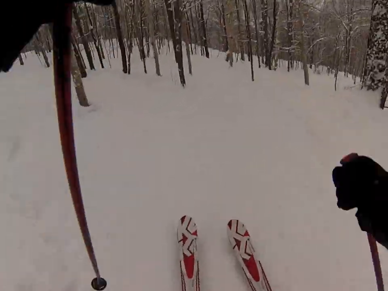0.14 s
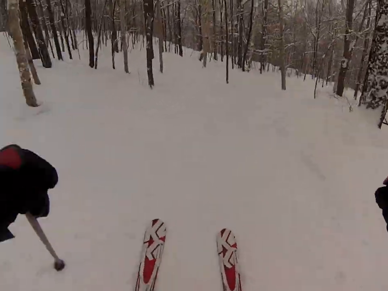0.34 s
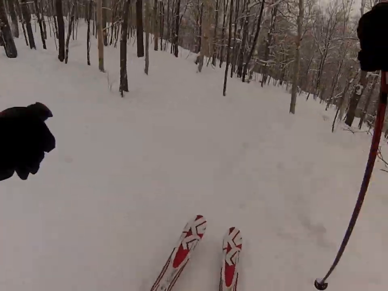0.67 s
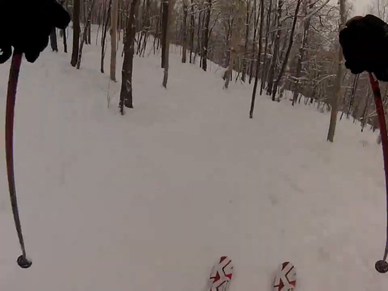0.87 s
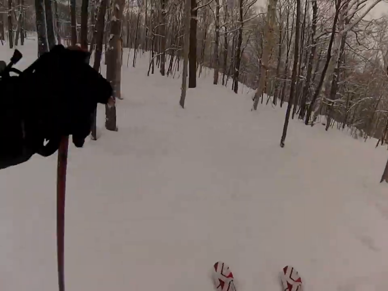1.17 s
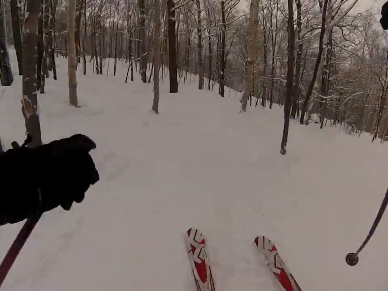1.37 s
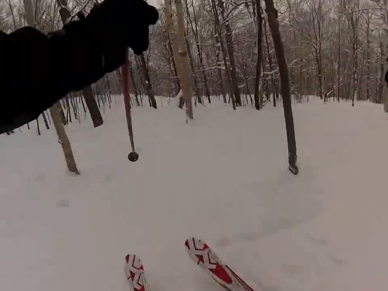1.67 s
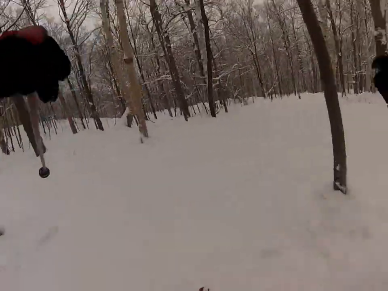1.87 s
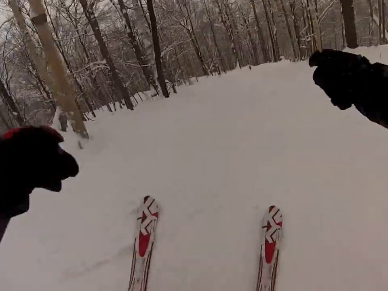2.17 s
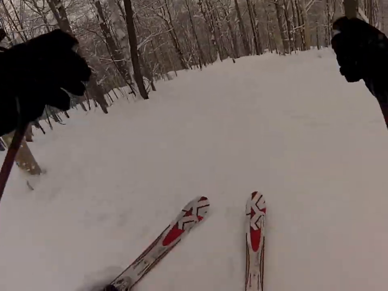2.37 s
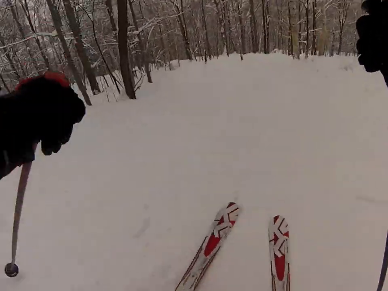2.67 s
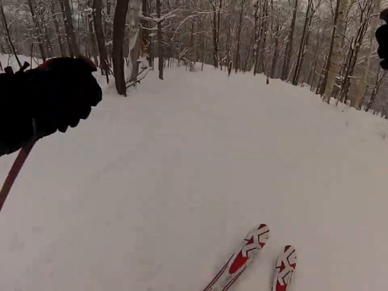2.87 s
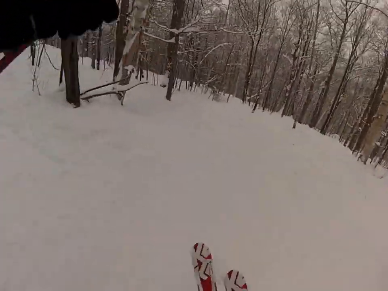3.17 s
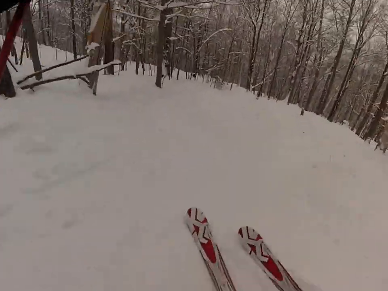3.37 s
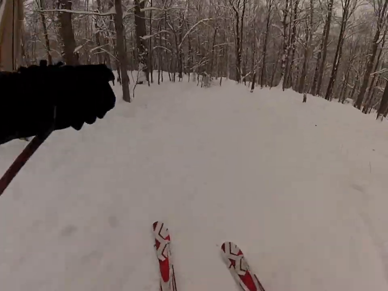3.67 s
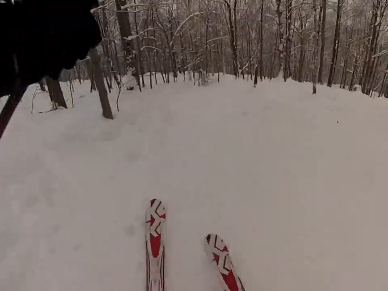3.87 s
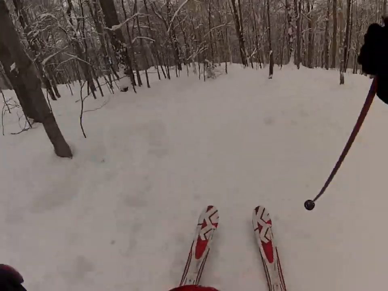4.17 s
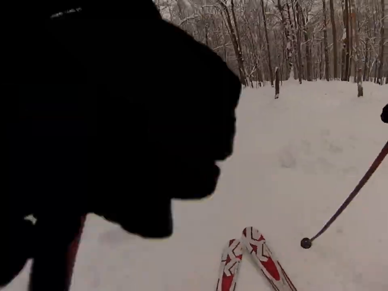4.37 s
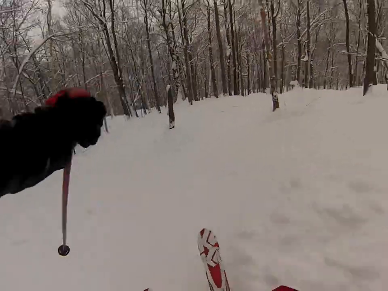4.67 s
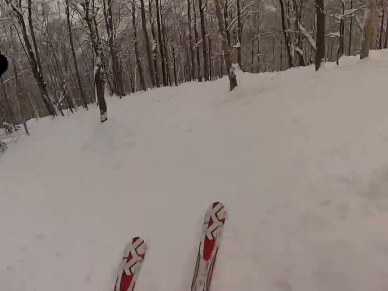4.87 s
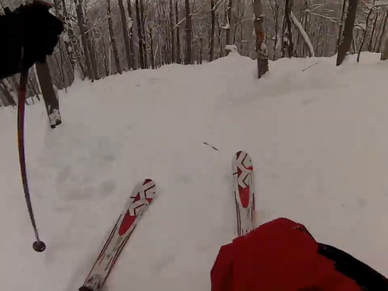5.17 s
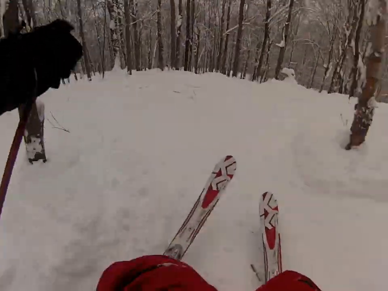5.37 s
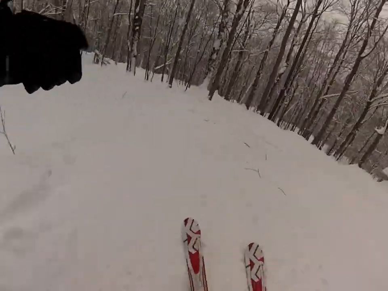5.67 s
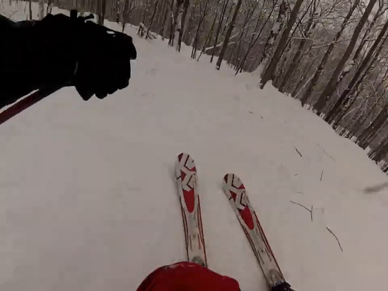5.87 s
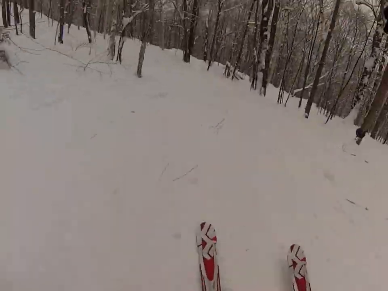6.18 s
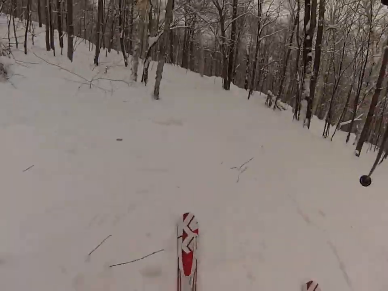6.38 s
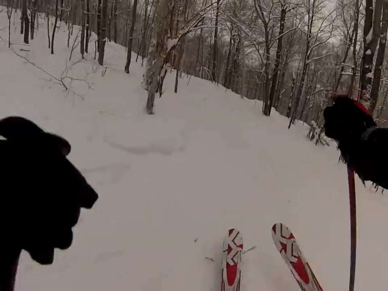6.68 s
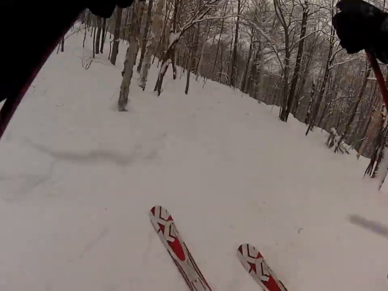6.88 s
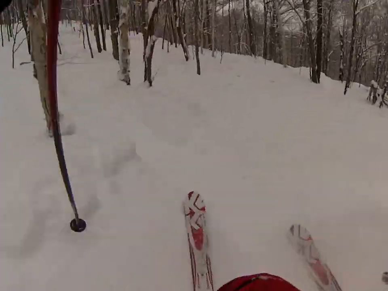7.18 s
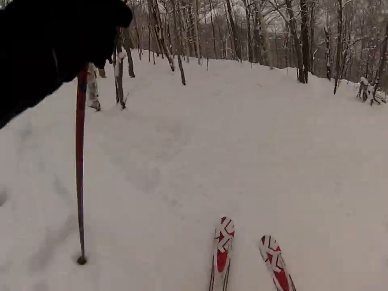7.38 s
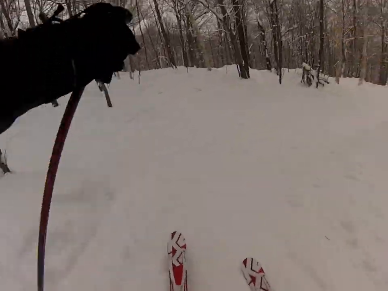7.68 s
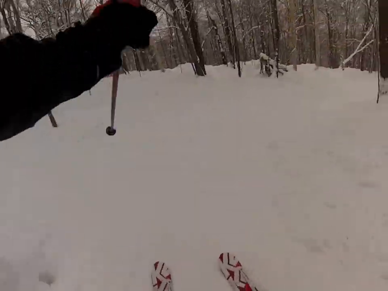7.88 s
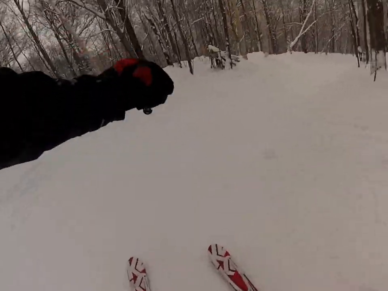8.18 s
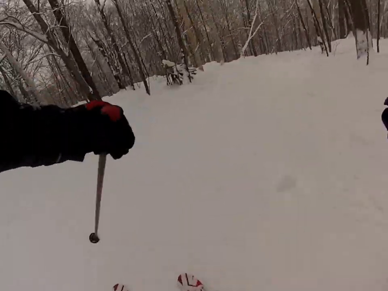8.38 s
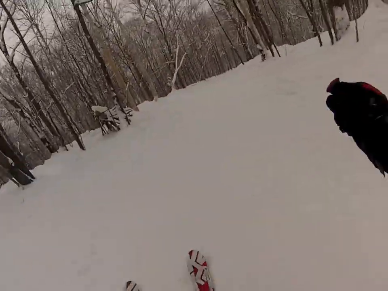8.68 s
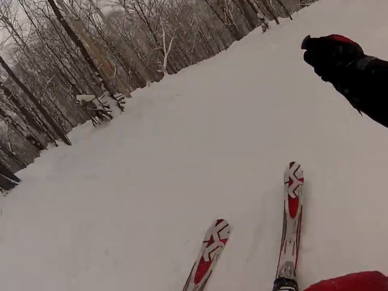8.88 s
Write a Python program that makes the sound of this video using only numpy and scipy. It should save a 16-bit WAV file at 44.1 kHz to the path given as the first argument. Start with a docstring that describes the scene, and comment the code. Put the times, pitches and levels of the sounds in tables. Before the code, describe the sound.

Heard through a closed plastic case on a skier's body, soft snow crunches and hisses in uneven swells as the skis carve down a slope. Wind rumbles low, gusting early and again midway. Heavy thumps jolt the microphone in bunches, mixed with sharp hollow clacks of gear and tiny ticks of thrown snow. Later the edges bite harder with a faint squeak, and a last swish ends in a few knocks.

```python
"""Skiing deep powder.

Heard from a camera in a closed plastic case worn by the skier. Each carve and scuff swells the
crunch of snow in the case's resonances; air and body motion rumble, and bumps jolt the mount.
Gear knocks and rattles against the case, and thrown snow crystals tick on it."""
import sys
import numpy as np
from scipy.fft import rfft, irfft, next_fast_len
from scipy.io import wavfile
from scipy.ndimage import uniform_filter1d, map_coordinates

SR = 44100
rng = np.random.default_rng(int(sys.argv[2]) if len(sys.argv) > 2 else 0)


def file_out(sig):
    """Save sig as 16-bit WAV at sys.argv[1]."""
    # one column per channel
    cols = np.atleast_2d(sig).T
    # limit, then scale
    lim = np.clip(cols, -1, 1)
    pcm = np.round(lim * 32767).astype(np.int16)
    wavfile.write(sys.argv[1], SR, pcm)


N = 398663


def amp(db):
    return 10 ** (np.asarray(db) / 20)


def unit_rms(x):
    return x / np.sqrt(np.mean(x ** 2) + 1e-20)


def db_at(spectrum, hz):
    """Interpolate (f/Hz, level/dB) rows on a log frequency axis."""
    row_hz, row_db = np.transpose(spectrum)
    return np.interp(np.log(hz + 1), np.log(row_hz), row_db)


def level_curve(rows):
    """Interpolate (t/s, level/dB) rows to one level per sample."""
    row_s, row_db = np.transpose(rows)
    return np.interp(np.arange(N) / SR, row_s, row_db)


def wobble(rate_hz):
    """Smooth random curve through rate_hz knots a second."""
    knots = rng.standard_normal(int(N * rate_hz / SR) + 4)
    return map_coordinates(knots, [np.arange(N) * rate_hz / SR])


def below(hz, edge_hz, order=8):
    """Low-pass gain."""
    return 1 / np.sqrt(1 + (hz / edge_hz) ** (2 * order))


def above(hz, edge_hz, order=8):
    """High-pass gain."""
    return np.sqrt(1 - below(hz, edge_hz, order) ** 2)


def resonance(hz, centre_hz, q):
    """Gain of two equal resonators in series."""
    ratio = (hz + 1) / centre_hz
    return 1 / (1 + (q * (ratio - 1 / ratio)) ** 2)


def filtered(x, gain):
    """Minimum-phase filter of magnitude gain(hz)."""
    half = next_fast_len(len(x) // 2 + SR // 20)
    hz = np.fft.rfftfreq(2 * half, 1 / SR)
    cepstrum = irfft(np.log(np.maximum(gain(hz), 1e-6)))
    cepstrum[1:half] *= 2
    cepstrum[half + 1:] = 0
    return irfft(rfft(x, 2 * half) * np.exp(rfft(cepstrum)))[:len(x)]


def shaped(x, spectrum):
    """Filter by a spectrum table, then scale to rms 1."""
    return unit_rms(filtered(x, lambda hz: amp(db_at(spectrum, hz))))


def add(track, start_s, sound):
    part = track[max(round(start_s * SR), 0):][:len(sound)]
    part += sound[:len(part)]


def crunch(rate_hz, spread_db, grain_db):
    """Smooth powder hiss plus tiny fractures of uneven size, rms 1."""
    size = amp(spread_db * np.minimum(rng.exponential(size=N), np.pi + 2))
    grains = (rng.random(N) < rate_hz / SR) * size * rng.choice([-1, 1], N)
    return unit_rms(rng.standard_normal(N) + amp(grain_db) * unit_rms(grains))


def swell(start_s, hold_s, attack_s, release_s):
    """Power of a stroke: builds, holds at 1, lets go."""
    t = np.arange(N) / SR - start_s
    away = np.maximum(-t / attack_s, (t - hold_s) / release_s)
    return np.exp(-np.clip(away, 0, 2 * np.pi) ** 2)


# Case resonances: f/Hz, width/Hz, lift/dB
CASE_MODES = [(990, 140, 3), (1450, 170, 7.5), (2120, 400, 8.5), (3560, 380, 6), (4420, 500, 4.5),
              (7230, 650, 5), (11050, 900, 3.5)]
def case_lift_db(hz):
    """Boost from the case's resonances."""
    return sum(db / (1 + (2 * (hz - mode_hz) / width_hz) ** 2) for mode_hz, width_hz, db in CASE_MODES)


# Wall transmission: f/Hz, gain/dB
WALL_GAIN = [(200, -11), (800, -15.5), (1150, -11.5), (1450, -6.5), (2400, -5.5), (2950, -17),
             (3400, -16.5), (5200, -16.5), (5800, -21.5), (7000, -22), (8300, -26), (12000, -33.5),
             (15500, -39)]
def case(hz):
    """Gain of the case: a dull wall lifted at its resonances."""
    return amp(db_at(WALL_GAIN, hz) + case_lift_db(hz))


# Skis running flat: t/s, rush/dB
GLIDE_LEVELS = [(0, -53.5), (1.2, -61), (1.8, -57), (3.05, -56.5), (3.8, -53.5), (4.35, -55), (5.2, -53),
                (5.7, -55), (6.8, -51.5), (7.7, -56.5), (8.38, -61), (8.6, -57), (9.04, -51.5)]
# Weight on the edges: t/s, length/s, rush/dB, spray/dB, rumble/dB
EDGE_CARVES = [(0.0, 0.18, -50.5, -60, -47.5), (.47, 0.21, -56.5, -65, -51), (0.818, 0.36, -57, -64.5, -48),
               (1.263, 0.23, -48.5, -57, -45.5), (1.59, 0.13, -54, -64, -48), (2.021, .27, -50, -58, -46.5),
               (2.37, 0.17, -49.5, -58, -48), (2.798, 0.15, -55, -61, -51), (3.195, 0.45, -49, -59, -42.5),
               (4.038, 0.19, -61, -70, -51), (4.48, 0.13, -48.5, -52.5, -39.5),
               (4.623, .16, -52, -62, -50.5), (4.888, 0.48, -51, -58.5, -44.5),
               (5.862, 0.21, -50.5, -62, -42), (6.175, 0.25, -54.5, -73, -45.5),
               (6.521, 0.19, -50.5, -57, -44), (6.846, .66, -48.5, -58.5, -49),
               (6.988, .13, -37.5, -48, -48), (7.933, 0.11, -54, -64, -51.5),
               (8.449, 0.19, -53, -60, -54.5), (8.72, .31, -51, -60, -48), (8.895, 0.12, -43.5, -54.5, -43)]
# An edge brushing a drift: t/s, rush/dB
EDGE_SCUFFS = [(.19, -50.5), (.68, -48), (.81, -54), (.98, -50.5), (1.08, -52), (1.70, -48), (1.905, -45.5),
               (2.13, -63), (2.671, -54.5), (2.90, -57), (4.20, -48), (4.31, -55), (4.77, -50.5),
               (4.94, -40.5), (5.10, -44.5), (5.232, -40), (5.33, -46), (5.39, -45.5), (5.51, -63),
               (5.69, -48.5), (5.77, -51), (5.87, -46), (6.02, -47), (6.25, -47), (6.61, -44.5),
               (7.11, -43), (7.23, -41.5), (7.47, -49.5), (8.01, -53.5), (8.29, -57.5), (8.78, -56)]
def footwork(attack_s=0.025, release_s=0.023, spray_hang_s=0.034, shudder_s=0.014):
    """Rush, spray and rumble in dB: glide, carves, scuffs and shudder after bumps add in power."""
    glide = amp(level_curve(GLIDE_LEVELS)) ** 2
    scuffs = sum(amp(db) ** 2 * swell(s, 0, attack_s=0.023, release_s=0.02) for s, db in EDGE_SCUFFS)
    rush = glide + scuffs
    spray = amp(-7) ** 2 * glide + amp(-12.5) ** 2 * scuffs
    rumble = amp(1.5) ** 2 * glide + amp(-0.5) ** 2 * scuffs
    for s, length_s, rush_db, spray_db, rumble_db in EDGE_CARVES:
        weight = swell(s, length_s, attack_s, release_s)
        rush += amp(rush_db) ** 2 * weight
        spray += amp(spray_db) ** 2 * swell(s, length_s, attack_s, spray_hang_s)
        rumble += amp(rumble_db) ** 2 * weight
    shudder = np.exp(-np.arange(SR // 2) / SR / shudder_s)
    for s, db, _ in BUMPS:
        add(rumble, s, amp(db - 25.5) ** 2 * shudder)
    return 10 * np.log10([rush, spray, rumble])


def powder_rush(crush):
    """The rush drifts between hollow and bright as the skis change angle."""
    hollow = filtered(crush, lambda hz: case(hz) * above(hz, 315, order=2) * below(hz, 1980, order=5))
    grit = crunch(rate_hz=450, spread_db=5, grain_db=-4)
    bright = filtered(grit, lambda hz: case(hz) * above(hz, 1447, order=5) * below(hz, 3340))
    tilt_db = 1.1 * wobble(16)
    return unit_rms(hollow * amp(tilt_db) + bright * amp(-tilt_db))


# Case modes rung by a biting edge: f/Hz, width/Hz, level/dB
SQUEAK_MODES = [(1450, 150, 0), (2130, 260, -6), (3560, 350, -20)]
def edge_squeak():
    """A loaded edge bites firmer snow and keeps the case's three strongest modes ringing."""
    def gain(hz):
        modes = sum(amp(db) * resonance(hz, mode_hz, q=mode_hz / width_hz)
                    for mode_hz, width_hz, db in SQUEAK_MODES)
        return above(hz, 940, order=4) * below(hz, 6000) * modes
    return unit_rms(filtered(crunch(rate_hz=510, spread_db=5, grain_db=-4), gain))


# Snow crystals on the case: f/Hz, density/dB
CRYSTAL_SPECTRUM = [(1500, -30), (4000, -2), (7200, 5), (9000, -3.5), (11500, -2), (15500, -8.5)]
def powder_spray(crush, pressure):
    """Fine spray hisses; a few thrown crystals sparkle above it."""
    powder = crush + crunch(rate_hz=1600, spread_db=6, grain_db=-12.5)
    mist = unit_rms(filtered(powder, lambda hz: case(hz) * above(hz, 3080)))
    sparkle = shaped(crunch(rate_hz=180, spread_db=2.4, grain_db=2), CRYSTAL_SPECTRUM)
    flurry_db = 0.5 * pressure + 1.1 * wobble(60)
    return mist * amp(flurry_db) + sparkle * amp(-14.5 + 2.2 * wobble(29))


def snow(rush_db, spray_db, bite_db=-41):
    """Skis crush powder and squeak under load; uneven pressure flutters rush and spray."""
    pressure = wobble(45)
    crush = crunch(rate_hz=450, spread_db=2.5, grain_db=-1)
    bite = 1 / (1 + amp(-3 * (rush_db - bite_db)))
    rush = np.sqrt(1 - bite) * powder_rush(crush) + np.sqrt(bite) * edge_squeak()
    spray = powder_spray(crush, pressure)
    flutter_db = 2.1 * pressure + 0.62 * wobble(130)
    return rush * amp(rush_db + 0.5 + flutter_db) + spray * amp(spray_db - 1.15)


# Airflow past the case: t/s, level/dB
WIND_LEVELS = [(0, -36.5), (.8, -43.5), (1.15, -43.5), (1.48, -27), (1.82, -45), (2.1, -34.5),
               (2.45, -41.5), (3.0, -40.5), (3.45, -34.5), (4.1, -43), (4.8, -37.5), (5.08, -25.5),
               (5.7, -42), (5.95, -37.5), (7.2, -37), (8.3, -50), (8.8, -35.5), (9.04, -30.5)]
# Buffeting: f/Hz, density/dB
WIND_SPECTRUM = [(8, -5.5), (18, 4.5), (30, -4.5), (55, -8.5), (100, -19), (200, -33), (500, -81.5)]
def wind():
    """Streaming air buffets the case."""
    buffet = shaped(rng.standard_normal(N), WIND_SPECTRUM)
    return buffet * amp(level_curve(WIND_LEVELS) + 2.5 + 0.34 * wobble(7.9))


# Body-borne rumble: f/Hz, density/dB
RUMBLE_SPECTRUM = [(50, -28), (100, 2), (150, 4), (230, -10), (370, -14.5), (550, -25.5), (900, -27.5),
                   (2000, -62.5)]
def ski_rumble(rumble_db):
    """The skis' vibration comes up through the body."""
    rumble = shaped(crunch(rate_hz=45, spread_db=3, grain_db=-1.5), RUMBLE_SPECTRUM)
    return rumble * amp(rumble_db - 0.03 + 2.2 * wobble(45))


# Microphone noise: f/Hz, density/dB
HISS_SPECTRUM = [(300, -1), (3000, -12), (11000, 0.5), (15500, -11.5)]
def microphone_hiss(level_db=-72):
    """The microphone's steady noise floor."""
    return amp(level_db) * shaped(rng.standard_normal(N), HISS_SPECTRUM)


GRAZE_S = 0.003
def contact(t60_s, scrape):
    """A hard touch: short graze, one impulse, dying scrape."""
    t = np.arange(SR // 20) / SR - GRAZE_S
    impulse = np.abs(t) == np.abs(t).min()
    envelope = amp(np.where(t < 0, 24 * t / GRAZE_S, -60 * t / t60_s))
    return impulse + scrape * rng.standard_normal(len(t)) * envelope


def struck(touch, gain):
    """A touch rung through a filter, scaled so its loudest 5 ms has a fixed level."""
    ring = filtered(touch, gain)
    loudest_power = uniform_filter1d(ring ** 2, size=SR // 200).max()
    return ring / np.sqrt(2 * np.pi * loudest_power)


def crumbs(spray_db, count=110):
    """Snow crumbs hit at random, scaled by the spray; each pings one upper case mode."""
    track = np.zeros(N)
    upper_hz = [hz for hz, _, _ in CASE_MODES if hz > 2000]
    for when, which, size in rng.random((count, 3)):
        mode_hz = upper_hz[int(which * len(upper_hz))]
        ping = struck(contact(t60_s=0.014, scrape=0.4), lambda hz: resonance(hz, mode_hz, q=5))
        over_spray_db = 12.5 + 18 * size ** 2 + 0.6 * db_at(WALL_GAIN, mode_hz)
        add(track, when * N / SR, amp(spray_db[int(when * N)] + over_spray_db) * ping)
    return track


# Bumps: t/s, level/dB, push/s
BUMPS = [(0.215, -24, 0.0049), (0.602, -10.5, 0.0086), (0.617, -11.5, 0.011), (1.267, -32.5, 0.0032),
         (1.371, -19, 0.019), (1.425, -16.5, 0.0088), (1.501, -9.5, 0.011), (1.607, -27.5, 0.0033),
         (1.727, -21, 0.012), (2.375, -14.5, 0.011), (2.401, -10, 0.0083), (2.455, -13.5, 0.014),
         (2.537, -14.5, 0.0077), (2.555, -12, 0.012), (3.423, -10.5, 0.0088), (3.489, -15.5, 0.014),
         (3.557, -14, 0.012), (3.611, -14, 0.011), (3.685, -17, 0.0096), (4.525, -9, 0.0094),
         (4.552, -14.5, 0.016), (4.621, -14.5, 0.0069), (4.95, -17.5, 0.019), (5.044, -14, 0.0038),
         (5.196, -18.5, 0.016), (5.269, -23, 0.013), (5.288, -22.5, 0.0062), (5.42, -25, 0.0027),
         (5.584, -13, 0.0023), (5.924, -18, 0.0098), (5.951, -14, 0.012), (6.312, -14.5, 0.0046),
         (6.658, -18, 0.0056), (6.772, -23, 0.0018), (8.997, -22.5, 0.0035), (9.008, -16.5, 0.0029)]
# Mount judder: t/s, level/dB, f/Hz, length/s
MOUNT_JUDDERS = [(0.606, -20.5, 188, .014), (2.542, -20, 119, 0.017), (5.052, -22, 117, 0.046),
                 (5.971, -17.5, 142, 0.033)]
def mount_jolts():
    """Bumps throw the mount to and fro by turns: quick push, slower rebound; some leave it juddering."""
    track = np.zeros(N)
    t = np.arange(SR // 6) / SR
    for k, (s, db, push_s) in enumerate(BUMPS):
        age = t / push_s
        swing = np.sin(np.pi * age ** 0.69) * np.exp(-(age / 1.84) ** 2)
        add(track, s, (-1) ** k * amp(db + 2) * swing)
    for s, db, judder_hz, length_s in MOUNT_JUDDERS:
        age_s = t[t < length_s]
        envelope = np.sqrt(np.sin(np.pi * age_s / length_s))
        add(track, s, amp(db) * envelope * np.sin(2 * np.pi * judder_hz * age_s))
    return filtered(track, lambda hz: below(hz, 420, order=4) * above(hz, 10, order=1))


# Crystal hits: t/s, level/dB
CRYSTAL_HITS = [(0.305, -30.5), (1.073, -35), (1.4694, -30), (2.151, -43), (2.166, -32), (2.1854, -39),
                (2.2106, -34), (2.217, -28), (2.2267, -26), (2.2407, -19), (2.2593, -30), (2.85, -38),
                (3.8436, -28), (4.3267, -28.5), (4.492, -30), (5.681, -35), (5.8205, -34), (6.656, -33),
                (6.841, -27), (7.701, -34), (8.105, -31.5), (8.238, -36)]
def crystal_ticks():
    """Flying crystals make tiny bright clicks on the case."""
    track = np.zeros(N)
    for s, db in CRYSTAL_HITS:
        click = struck(contact(t60_s=0.006, scrape=0.3), lambda hz: amp(db_at(CRYSTAL_SPECTRUM, hz)))
        add(track, s - GRAZE_S, amp(db - 13) * click)
    return track


# Gear hits: t/s, level/dB, ring f/Hz, relative body/dB, relative edge/dB
GEAR_HITS = [(0.356, -32, 2050, -20, -36), (0.514, -29, 2150, -26, -37),
             (0.6063, -16.5, 1780, -13.5, -20.5), (1.11, -27.5, 1460, -17, -15.5),
             (1.1767, -33.5, 1470, -30, -31), (1.284, -19.5, 1470, -16.5, -24),
             (1.47, -31, 4460, -10, -9.5), (1.5008, -31, 2060, -7.5, -22), (2.4009, -33.5, 950, -24, -18),
             (2.4486, -28.5, 1470, -21, -7), (2.5401, -36, 1550, -5, -19), (2.5605, -42, 1000, -3, -18),
             (2.5711, -33.5, 1420, -11, -6.5), (2.765, -41.5, 1480, -27, -3.5),
             (2.7985, -35, 1450, -14, -25), (3.1395, -39, 2070, -25, -14),
             (3.8429, -22.5, 1570, -53, -19.5), (4.5257, -17, 1800, -17, -22.5),
             (4.621, -25, 1490, -15, -36), (5.0439, -26.5, 1560, -14, -15),
             (5.5684, -31.5, 1990, -6.5, -18), (5.5847, -16, 1530, -6, -18.5), (5.9934, -42, 2000, 5, -25),
             (6.021, -27, 2150, -35, -37), (6.049, -28.5, 1170, -13, -35), (6.2178, -36, 2260, 0, -7.5),
             (6.3113, -23, 2120, -16, -22.5), (6.772, -30, 1840, -7, -39), (6.8425, -17, 1990, -24, -15.5),
             (6.885, -29.5, 3650, -34, -8), (7.049, -24.5, 1450, -28, -32), (7.5682, -39.5, 3550, -35, -6),
             (8.127, -35, 1400, -20, -20), (8.982, -18, 2100, -6.5, -21), (9.0158, -19, 1490, -11.5, -34)]
def gear_knocks():
    """Each knock favours one case resonance; heavy ones sound the hollow body, hard ones upper modes."""
    track = np.zeros(N)
    for s, db, ring_hz, body_db, edge_db in GEAR_HITS:
        touch = contact(t60_s=0.026, scrape=0.24)
        sharp_touch = contact(t60_s=0.017, scrape=0.45)
        ring = struck(touch, lambda hz: case(hz) * above(hz, 1230, order=4)
                      * resonance(hz, ring_hz, q=1.85))
        body = struck(touch, lambda hz: amp(0.14 * case_lift_db(hz))
                      * above(hz, 250, order=2) * below(hz, 1740, order=5))
        edge = struck(sharp_touch, lambda hz: case(hz) * amp(case_lift_db(hz))
                      * above(hz, 2680) * below(hz, 4100, order=2))
        knock = ring + amp(body_db + 6) * body + amp(edge_db + 9) * edge
        add(track, s - GRAZE_S, amp(db - 3) * knock)
    return track


# Thrown powder: t/s, length/s, level/dB
POWDER_CLOUDS = [(1.267, 0.45, -65.5), (2.1, 0.24, -57)]
def powder_showers():
    """A cloud of powder patters on the case as many tiny clicks."""
    envelope = np.zeros(N)
    for s, length_s, db in POWDER_CLOUDS:
        add(envelope, s, amp(db) * np.sqrt(np.hanning(int(length_s * SR))))
    return envelope * shaped(crunch(rate_hz=140, spread_db=2.5, grain_db=8), CRYSTAL_SPECTRUM)


def scene():
    """Footwork drives snow and rumble; wind, blows on the case and hiss come on top. Mono."""
    rush_db, spray_db, rumble_db = footwork()
    ride = snow(rush_db, spray_db) + crumbs(spray_db) + wind() + ski_rumble(rumble_db)
    blows = mount_jolts() + gear_knocks() + crystal_ticks() + powder_showers()
    return (ride + blows + microphone_hiss())[None]


def record(dry):
    """The camera keeps nothing above its band limit."""
    limit_hz = 15600
    n_fft = next_fast_len(N + SR // 2)
    passband = np.fft.rfftfreq(n_fft, 1 / SR) < limit_hz
    return irfft(rfft(dry, n_fft) * passband, n_fft)[..., :N]


dry = scene()
out = record(dry)
file_out(out)
```